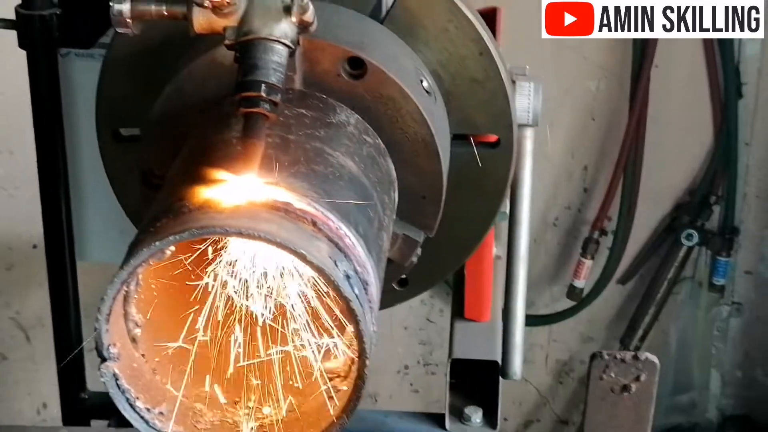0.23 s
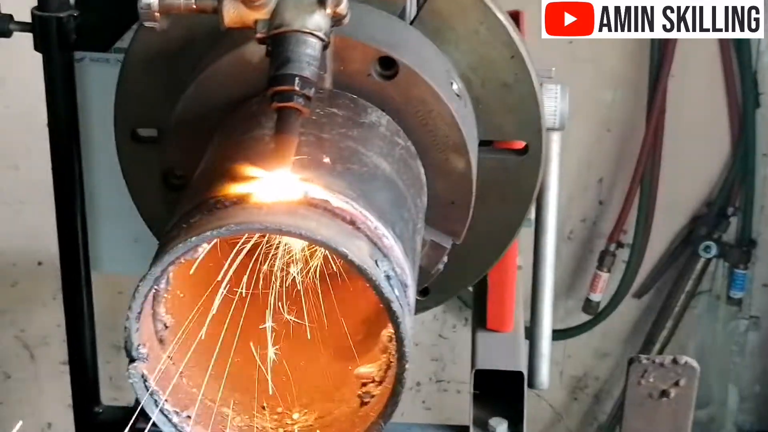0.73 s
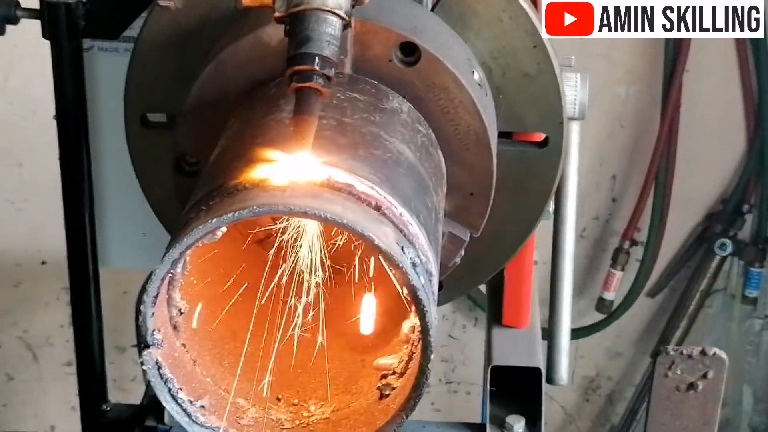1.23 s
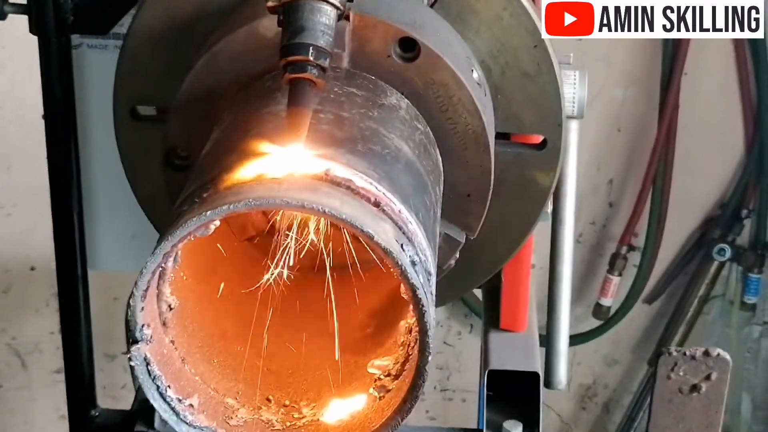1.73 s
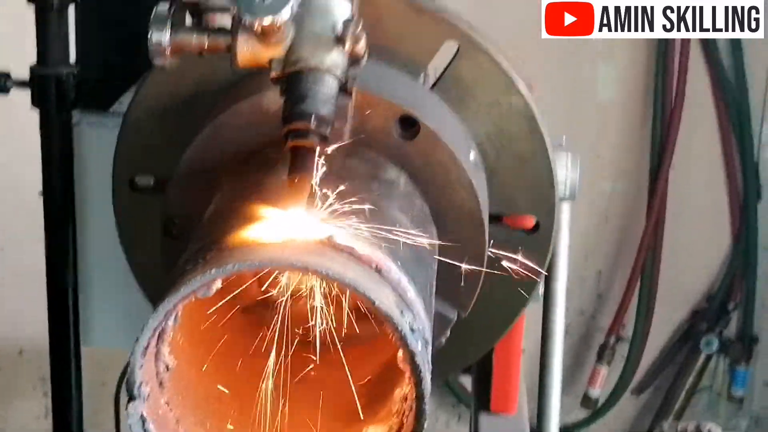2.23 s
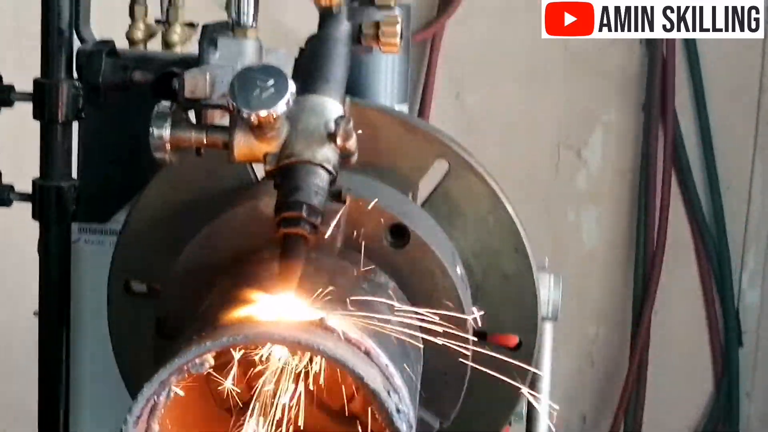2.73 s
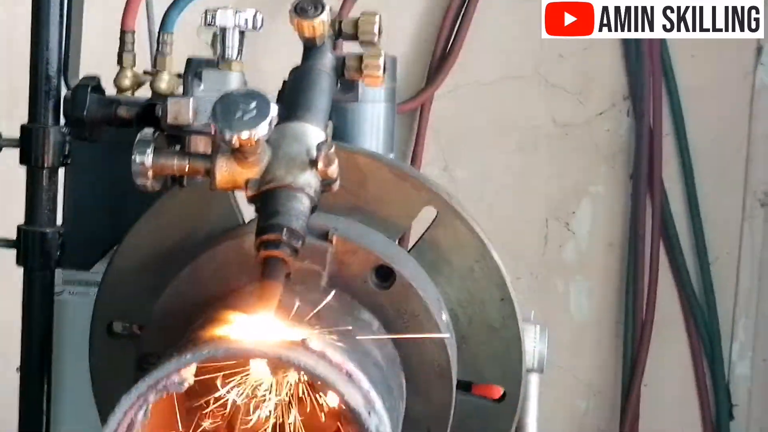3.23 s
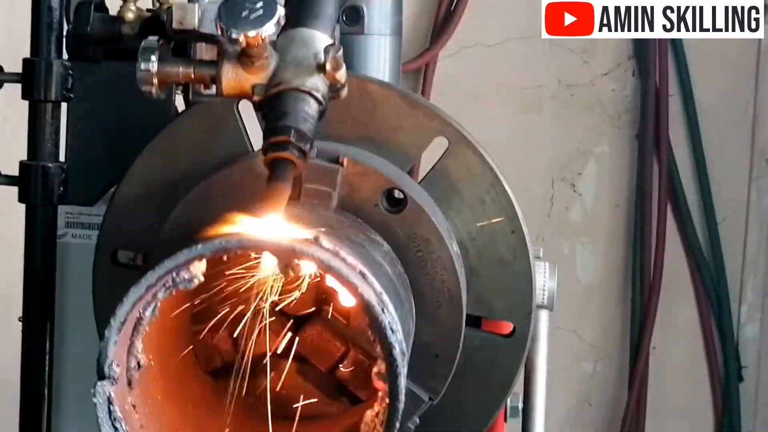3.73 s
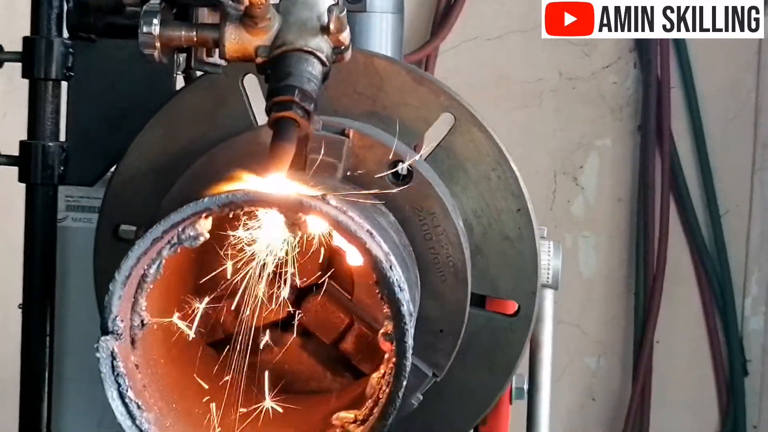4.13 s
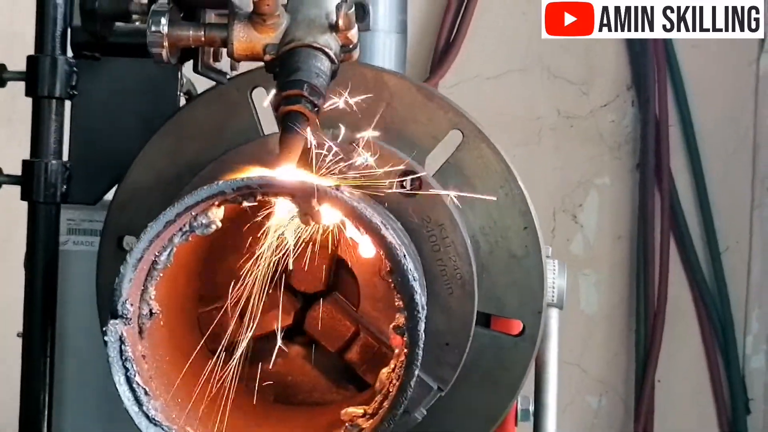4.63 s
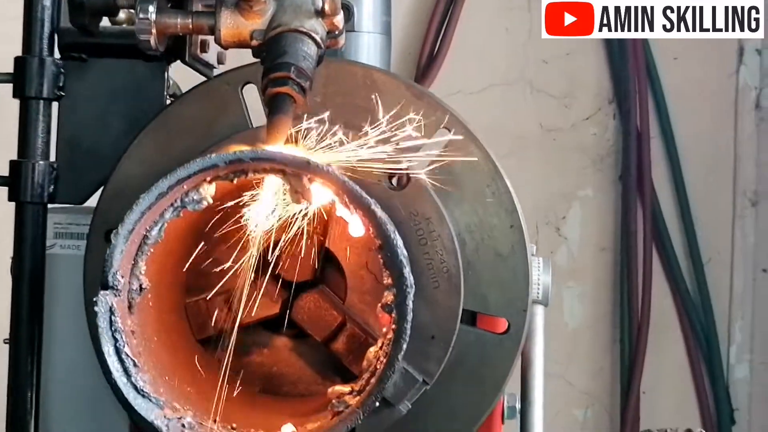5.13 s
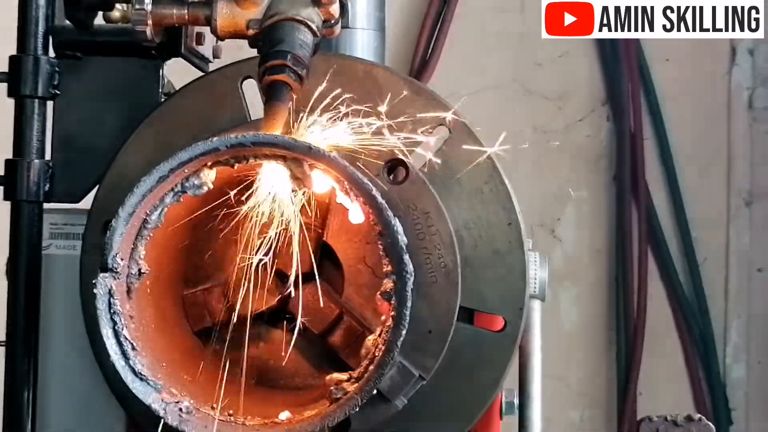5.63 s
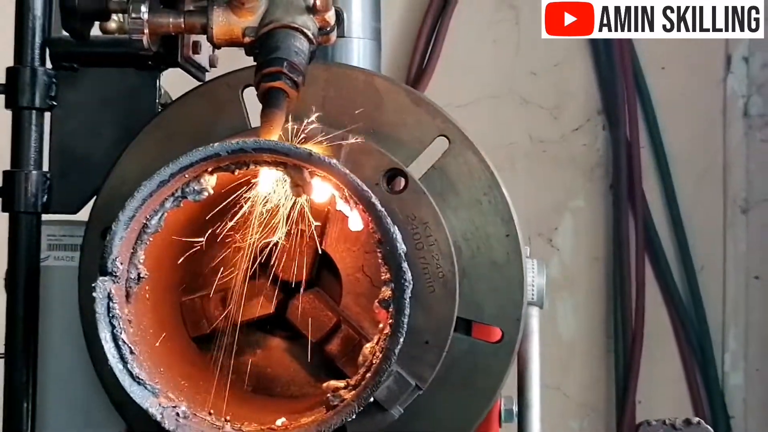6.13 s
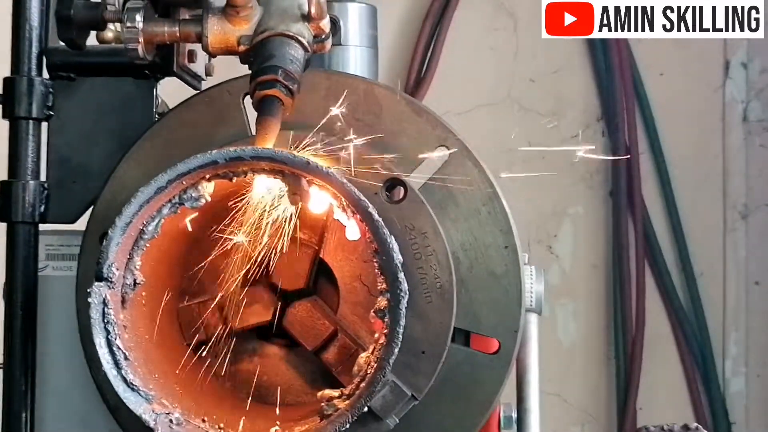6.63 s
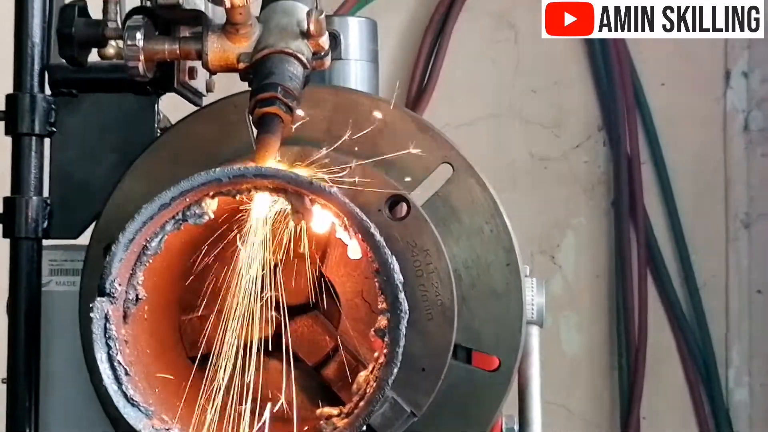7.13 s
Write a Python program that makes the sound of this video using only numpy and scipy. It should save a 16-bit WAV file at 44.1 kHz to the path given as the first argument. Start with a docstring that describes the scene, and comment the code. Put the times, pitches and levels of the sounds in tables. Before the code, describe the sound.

A cutting torch burns through a steel pipe in a workshop, heard close at the open end in stereo. A dense, bright, fluttering hiss runs throughout with fine sizzling sparks. It thins after about a second, wavers, then regains full strength by three and a half seconds and stays strong. Faint hollow rumble and drone from the pipe sit underneath.

```python
"""Torch cutting a steel pipe

An oxy-acetylene torch cuts round a pipe in a workshop, heard close to the open pipe end by a moving stereo pair.
Nozzle hiss, kerf shrill, slag spray and flame roar are filtered noise with fluttering levels; random puffs crackle.
The bore adds rumble and drone in gusts, noise-fed resonances and wavering sine notes.
Edge tones and broader bands of the jet are noise swells; a faint sine hums beneath."""
import sys
import numpy as np
from scipy import signal
from scipy.fft import rfft, irfft, next_fast_len
from scipy.io import wavfile
from scipy.ndimage import map_coordinates

SR = 44100
rng = np.random.default_rng(int(sys.argv[2]) if len(sys.argv) > 2 else 0)


def pcm_store(signal):
    """Save signal as 16-bit PCM."""
    levels = np.round(np.clip(np.atleast_2d(signal), -1, 1) * 32767)
    wavfile.write(sys.argv[1], SR, levels.astype(np.int16).T)


N = 325458
TIME_S = np.arange(N) / SR
FFT_SIZE = next_fast_len(N)
FREQS_HZ = np.maximum(np.arange(FFT_SIZE // 2 + 1) * SR / FFT_SIZE, 1)

# Noise spectra of the streams. Each row: frequency in Hz, relative density in dB.
ROAR_SPECTRUM = [(450, -30), (750, -12.5), (1000, -2.5), (1220, -5), (1360, -2.5), (1480, 0), (1650, 0),
                 (2100, 1), (3000, -57), (5000, -45)]
RUSH_SPECTRUM = [(1400, -23), (1850, -5.5), (2150, -0.5), (2450, 4), (2750, 0.8), (3050, 2.5), (3350, 2.5),
                 (3620, -7.5), (4100, -7), (5000, -19.5)]
FIZZ_SPECTRUM = [(10000, -28.5), (10900, -1), (11400, 2.5), (12000, 0), (12600, -1), (13200, -1),
                 (14000, -7), (14700, -9), (15500, -27)]
KERF_SPECTRUM = [(3700, -41.5), (4250, -9.5), (4750, -2.5), (5050, -1), (5400, 1.5), (5750, -1.5),
                 (6020, 1), (6400, -6), (7200, -7), (9000, -41)]
NOZZLE_SPECTRUM = [(2800, -29), (3800, -5.5), (4500, -5.5), (6200, -4), (6650, 6), (6850, 3.5), (7150, 6.5),
                   (7600, 2.5), (8300, -5), (10000, -13), (13700, -13), (14550, -2.5), (15000, -1.5),
                   (15500, -12)]
SPRAY_SPECTRUM = [(6000, -26.5), (7800, 0), (8500, 1), (9100, -0.5), (9700, 3.5), (10250, 2.5),
                  (10700, -1.5), (11500, -23), (14000, -40)]
RUMBLE_SPECTRUM = [(15, -5), (43, 3), (72, 0), (100, -0.7), (185, 0.3), (240, -4.5), (330, -7.5),
                   (450, -16), (900, -54)]
DRONE_SPECTRUM = [(250, -29), (400, -8.5), (510, 4), (590, 1.5), (665, -5.5), (760, 0.5), (950, -8.5),
                  (1500, -47)]

# Microphone level difference. Each row: frequency in Hz, left over right in dB.
MIC_BALANCE = [(28, 4), (70, 1.5), (700, 4), (1100, -0.5), (1600, -7), (2100, -11), (2500, -8.5),
               (3100, -3.5), (4100, -1), (5000, -2.5), (6500, -0.5), (7500, 5), (8900, -3.5), (9800, 4),
               (11300, -10), (15000, 0)]
# Shared part of the noise at the two microphones. Each row: frequency in Hz, share of power 0-1.
MIC_LIKENESS = [(30, 0.36), (500, 0.82), (1100, 0.83), (1700, 0.52), (2700, 0.28), (3600, 1), (4300, 0.67),
                (5200, 0.81), (6300, 0.36), (8300, 0.64), (8900, 0.1), (9700, 0.39), (11500, 0.4),
                (15000, .22)]
# Microphone phase difference. Each row: frequency in Hz, lead of the left in radians.
MIC_LEAD = [(100, 0), (1750, .25), (2300, 1.5), (3000, 3.0), (4050, 3.2), (4700, 4.6), (5700, 6.2),
            (6400, 8.3), (7000, 10.1), (8700, 11.3), (9100, 14), (10700, 15.2), (12500, 21), (15500, 31)]

# Burning in the cut, slack while the jet barely gets through. Each row: time in seconds, dB about the steady cut.
VIGOUR = [(0.0, -4), (.17, -2.5), (.29, -0.6), (0.98, 0.3), (1.19, -1), (1.3, -3), (1.48, -7), (1.82, -6.5),
          (1.92, -3.5), (2.24, -5), (2.36, -3), (2.65, -5.5), (3.04, -1.8), (3.7, 0), (3.78, -1.1),
          (5.42, 0), (5.56, -0.4), (5.86, 0.75), (6.68, 0.5), (7.36, 1.6)]
# The cut spits or catches on slag. Each row: peak in seconds, length in seconds, change of vigour in dB.
SPITS = [(0.42, 0.055, 2.5), (1.198, 0.03, 0), (2.08, .04, -0.5), (3.9, 0.094, -2), (4.176, 0.033, -3),
         (5.365, 0.051, 1), (5.525, 0.09, 0), (6.325, 0.064, -0.5), (6.598, .05, 0.5), (7.0, .06, 0)]
# The jet beams past the moving microphones. Each row: time in seconds, left over right in dB.
BEAM = [(0.0, -2), (0.32, -4), (1.04, -6), (1.4, 4), (2.32, 4.5), (3.36, 1), (5.0, -1.5), (7.38, -2)]
# Flame rush at the microphones. Each row: time in seconds, level in dB, left over right in dB.
RUSH_VIEW = [(0, -41.5, -4.5), (0.7, -39, -3), (1.201, -38.5, -5.5), (1.5, -46, -6), (1.95, -41, 0.5),
             (2.65, -41.5, -2), (3.0, -39, -0.5), (3.5, -39, -2.5), (4.2, -38, -3), (4.9, -40.5, -1.5),
             (5.7, -39.6, -4.5), (6.35, -38.5, -3), (6.8, -39, -4), (7.38, -38.5, -5)]
# Top fizz of the slag. Each row: time in seconds, level in dB, left over right in dB.
FIZZ_VIEW = [(0, -39, -3.5), (.6, -38.5, -1), (1.1, -36.5, -2), (1.45, -43.5, 0), (2.0, -41.5, 7),
             (2.6, -43.5, 5), (3.1, -39, -3), (3.6, -39, -4), (4.4, -38, -4.5), (5.3, -37.5, -4),
             (6.2, -38.5, -2), (7.38, -39, -3)]
# Nozzle hiss as the microphones rise and return. Each row: time in seconds, steady-cut level in dB, left over right in dB.
NOZZLE_VIEW = [(0.0, -30, -8), (.4, -36, 17), (1.4, -32.5, -4.5), (2.1, -29.5, -2.5), (3.4, -33, -2),
               (5.2, -32, 0), (6.2, -35, 2), (7.38, -34, 3)]
# Resonance of the slot before wander. Each row: time in seconds, frequency in Hz.
SLOT_PITCH = [(0, 5418), (.5, 5353), (.9, 5587), (1.2, 5884), (2.2, 5514), (3.6, 5495), (4.4, 5580),
              (4.95, 5858), (5.4, 5550), (5.8, 5200), (6.4, 5292), (7.38, 5460)]
# Kerf phase as the microphones move. Each row: time in seconds, further lead of the left in radians.
KERF_LEAD = [(0, 0.52), (.75, 0.49), (1.25, -.6), (1.75, -0.051), (2.75, -.4), (3.25, -0.73), (3.75, -0.23),
             (4.75, 0.31), (5.75, 0.25), (7.38, .3)]
# Hiss arriving by way of the walls. Each row: time in seconds, share of power 0-1.
INDIRECT = [(0, 0.5), (1.7, 0.47), (2.3, 0.3), (2.8, 0.07), (4.6, 0.02), (5.25, 0.4), (5.75, 0.07),
            (7.38, .03)]

# Flame gusts and lulls in the bore. Each row: peak in seconds, length in seconds, rumble rise in dB,
# drone rise in dB, rumble swing to the left in dB.
GUSTS = [(.03, 0.19, 1.5, -6, 6), (.42, .09, 0, -1, 1), (.63, 0.15, 2, 1, 4), (.68, 0.71, 7.5, 6.5, 11),
         (1.055, 0.16, 4, 7, 0), (1.905, 0.38, 5, 7, -5), (2.325, 0.25, -1, 7, 4),
         (2.62, .18, -1, -0.5, -4), (3.287, 0.15, -2, 0.5, -2), (3.45, 1.46, 1, 9, 2),
         (5.1, .6, -2.5, -3, -2), (5.92, .14, 4, 0, 7), (6.76, 0.09, 5, 1, 4), (7.36, 0.23, 1, -6, 0)]
# Held note of the bore. Each row: time in seconds, frequency in Hz, level in dB before flutter.
HELD_NOTE = [(0, 593, -75), (.4, 594, -73), (.9, 600, -84), (1.8, 598, -87), (2.15, 606, -67),
             (2.55, 618, -73), (2.8, 624, -62), (3.1, 626, -61.5), (3.5, 630, -63), (3.72, 630, -66),
             (3.95, 629, -77), (4.6, 629, -71), (5.0, 610, -73), (5.6, 600, -71), (5.95, 605, -60),
             (6.2, 603, -73), (6.5, 602, -63), (7.0, 602, -66.5), (7.38, 611, -69.5)]
# Brief sagging notes of the bore. Each row: peak in seconds, length in seconds, frequency at the peak in Hz, level in dB.
PIPINGS = [(3.307, .26, 474, -57), (4.968, 0.19, 932, -62), (5.221, 0.084, 928, -59),
           (5.3, .25, 734, -69.5), (5.412, .11, 910, -61), (6.87, 0.37, 738, -68), (7.171, 0.11, 930, -62)]
# Edge tones and broader bands of the jet. Each row: peak in seconds, length in seconds, frequency in Hz,
# half-width in Hz, level in dB before the common trim, left over right in dB.
WHISTLES = [(.42, .45, 5290, 45, -45, 0), (.46, .3, 7100, 18, -45, 4), (.5, .8, 4780, 150, -44, 0),
            (.55, .65, 5470, 25, -45, 0), (.7, .8, 10250, 300, -48, -8), (.8, 1.4, 3700, 250, -53, -3),
            (1.0, .5, 6030, 50, -46, 3), (1.3, .28, 13900, 600, -46, -10), (1.45, .3, 2500, 300, -54, 6),
            (1.75, .45, 14600, 450, -47, -1), (2.3, .7, 13700, 250, -51, -14),
            (2.85, .3, 13300, 350, -49, -14), (2.85, .55, 14600, 450, -46, -9),
            (3.0, .7, 6300, 450, -43.5, 3), (3.3, .55, 13100, 450, -45.5, -12),
            (3.8, .5, 12300, 350, -48, -10), (3.85, 1.1, 2150, 200, -52, -2),
            (5.145, .11, 6690, 15, -46, 0)]
# Bore resonances blown by the flame. Each row: peak in seconds, length in seconds, frequency in Hz,
# half-width in Hz, level in dB.
HOOTS = [(.5, 1.27, 970, 330, -56.5), (.75, 0.76, 192, 18, -70.5), (.85, 0.67, 1375, 76, -60),
         (1.108, 0.22, 515, 51, -57), (1.9, 0.18, 1380, 50, -64.5), (2.1, 1.3, 1070, 59, -65),
         (2.1, 0.43, 195, 12, -71), (2.286, 0.2, 515, 15, -63), (2.302, 0.24, 390, 56, -69),
         (2.375, .14, 767, 22, -58), (3.295, 0.2, 215, 38, -66), (3.298, .25, 370, 47, -67),
         (3.327, 0.15, 530, 45, -53.5), (3.3, 0.14, 630, 40, -61), (3.7, 0.71, 394, 58, -67.5),
         (3.956, 0.14, 533, 15, -61), (4.651, 0.39, 530, 22, -63.5)]

# Levels at the steady cut; FOLLOWS is the share of the vigour's swing.
ROAR_DB, ROAR_FOLLOWS = -49.5, 1.13
KERF_DB, KERF_FOLLOWS = -32.5, 0.86
SPRAY_DB, SPRAY_FOLLOWS = -36, 0.69
SLOT_DB, SLOT_FOLLOWS = -42, 2.1
NOZZLE_FOLLOWS = 0.59
SLOT_HALF_WIDTH_HZ, SLOT_WANDER_HZ = 220, 69.57
# Left over right with the beam centred, and share of the beam's swing.
ROAR_LEAN_DB, ROAR_BEAM = 4, 0.66
SPRAY_LEAN_DB, SPRAY_BEAM = -1.3, 0.13
RUMBLE_DB, DRONE_DB = -67, -64.5  # between gusts
SAG_HZ_PER_S = 14
HUM_HZ, HUM_DB = 96, -80.5
ECHO_DB = -19  # each path, before the sum is rescaled
TAIL_T60_S = 0.28  # before its spectrum is flattened
TAIL_SWAY_S = 0.0006
CUTOFF_HZ = 15750


def from_db(db):
    """Decibels to gain."""
    return 10 ** (np.asarray(db) / 20)


def in_time(rows):
    """Columns of a time table at every sample."""
    s, *columns = np.transpose(rows)
    return [np.interp(TIME_S, s, column) for column in columns]


def at_hz(rows, hz=FREQS_HZ):
    """A frequency table read on a log axis."""
    knots_hz, values = np.transpose(rows)
    return np.interp(np.log(hz), np.log(knots_hz), values)


def pan(lean_db):
    """Left and right gains of constant total power."""
    sides = from_db(lean_db * np.array([[0.5], [-0.5]]))
    return np.sqrt(2) * sides / np.hypot(*sides)


def bell(peak_s, length_s):
    """Bell of height 1, above half height for the given length."""
    return 0.5 ** ((2 * (TIME_S - peak_s) / length_s) ** 2)


def rise_and_fall(peak_s, length_s, db):
    """Bell-shaped gain that peaks at the given level."""
    return from_db(db) * bell(peak_s, length_s)


def drift(rate_hz):
    """Slow random signal of spread 1: noise through two equal one-pole low-passes."""
    step, settle = 40, 2000
    pole = np.exp(-2 * np.pi * rate_hz * step / SR)
    noise = rng.standard_normal(N // step + settle + 2)
    slow = signal.lfilter([1], [1, -2 * pole, pole * pole], noise)[settle:]
    return np.interp(np.arange(N) / step, np.arange(len(slow)), slow / slow.std())


def turbulence():
    """Stereo spectrum of white noise: a shared direct part and a diffuse part for each microphone."""
    direct, *diffuse = rfft(rng.standard_normal((3, FFT_SIZE)))
    alike = np.clip(at_hz(MIC_LIKENESS), 0, 1)
    pair = np.sqrt(alike) * direct + np.sqrt(1 - alike) * np.array(diffuse)
    pair[1] *= np.exp(-1j * at_hz(MIC_LEAD))
    return pair * pan(at_hz(MIC_BALANCE))


def coloured(noise, response):
    """Stereo noise through a frequency response; rms 1 over both channels."""
    x = irfft(noise * response, FFT_SIZE)[:, :N]
    return x / x.std()


def resonance(hz, half_width_hz):
    """Response that falls to half amplitude at the half-width."""
    return 1 / (1 + ((FREQS_HZ - hz) / half_width_hz) ** 2)


def gas(spectrum, level_db, flutter_db, flutter_hz):
    """Turbulent stream whose strength flutters about its level."""
    gain = from_db(level_db + flutter_db * drift(flutter_hz))
    return gain * coloured(turbulence(), from_db(at_hz(spectrum)))


def aimed(spectrum, view, flutter_db, flutter_hz):
    """Fluttering stream whose level and side change as the microphones move."""
    level_db, lean_db = in_time(view)
    x = coloured(turbulence(), from_db(at_hz(spectrum)))
    x = x / x.std(axis=1, keepdims=True)
    return from_db(level_db + flutter_db * drift(flutter_hz)) * pan(lean_db) * x


def shrill(vigour_db):
    """The jet excites the slot it has cut; the resonance slides as the slot changes shape."""
    hz = in_time(SLOT_PITCH)[0] + SLOT_WANDER_HZ * drift(3)
    centre_hz = hz.mean()
    band = coloured(turbulence(), resonance(centre_hz, SLOT_HALF_WIDTH_HZ))
    slide = np.exp(2j * np.pi * np.cumsum(hz - centre_hz) / SR)
    slid = (signal.hilbert(band, FFT_SIZE)[:, :N] * slide).real
    return from_db(SLOT_DB + SLOT_FOLLOWS * vigour_db) * slid


def shifted(x):
    """Turn the right channel's phase as the path from the kerf changes."""
    lead_rad, = in_time(KERF_LEAD)
    right = signal.hilbert(x[1], FFT_SIZE)[:N] * np.exp(-1j * lead_rad)
    return np.array([x[0], right.real])


def sparks(level_db, per_s, spread_db, decay_s):
    """Drops of burning steel burst at random, each a tiny bright puff of decaying noise."""
    sizes = from_db(spread_db * np.minimum(rng.exponential(1, N), 4))
    bursts = (rng.random(N) < per_s / SR) * sizes
    envelope = signal.lfilter([1], [1, -np.exp(-1 / (decay_s * SR))], bursts + 1e-18)
    response = sum(from_db(at_hz(spectrum)) for spectrum in (SPRAY_SPECTRUM, FIZZ_SPECTRUM, KERF_SPECTRUM))
    crackle = envelope * coloured(turbulence(), response)
    return from_db(level_db) * crackle / crackle.std()


def reflections(x, longest_s, sway_s, count=10):
    """Pipe wall, chuck and bench echo the torch; the paths sway, so a fine comb shifts through the sound."""
    out = x.copy()
    for channel in range(2):
        for delay_s in rng.uniform(longest_s / 10, longest_s, count):
            arrival_s = TIME_S - delay_s - sway_s * drift(0.23)
            out[channel] += from_db(ECHO_DB) * np.interp(arrival_s, TIME_S, x[channel], left=0)
    return out / np.sqrt(1 + count * from_db(ECHO_DB) ** 2)


def workshop(x):
    """A short diffuse tail, unrelated and swaying in the two channels, replaces part of the direct sound."""
    share = np.clip(in_time(INDIRECT)[0], 0, 1)
    tail = rfft(rng.standard_normal((2, N)) * from_db(-60 * TIME_S / TAIL_T60_S), FFT_SIZE)
    # Only the tail's phase is used, so the tone is unchanged.
    wet = irfft(rfft(x, FFT_SIZE) * tail / np.abs(tail), FFT_SIZE)[:, :N]
    swayed = np.array([map_coordinates(side, [(TIME_S - TAIL_SWAY_S * drift(0.5)) * SR], order=3)
                       for side in wet])
    return np.sqrt(1 - share) * x + np.sqrt(share) * swayed


def hiss():
    """Roar, kerf, spray and crackle rise with the vigour of the cut, the nozzle less; rush and fizz keep their own levels."""
    vigour_db = in_time(VIGOUR)[0] + sum(db * bell(s, length_s) for s, length_s, db in SPITS)
    beam_db, = in_time(BEAM)
    nozzle_db, nozzle_lean_db = in_time(NOZZLE_VIEW)
    spray_db = SPRAY_DB + SPRAY_FOLLOWS * vigour_db
    roar = gas(ROAR_SPECTRUM, ROAR_DB + ROAR_FOLLOWS * vigour_db, flutter_db=1.0, flutter_hz=13)
    rush = aimed(RUSH_SPECTRUM, RUSH_VIEW, flutter_db=1.0, flutter_hz=27)
    fizz = aimed(FIZZ_SPECTRUM, FIZZ_VIEW, flutter_db=1.2, flutter_hz=20)
    kerf = gas(KERF_SPECTRUM, KERF_DB + KERF_FOLLOWS * vigour_db, flutter_db=0.9, flutter_hz=12.5)
    kerf = kerf + shrill(vigour_db)
    nozzle = gas(NOZZLE_SPECTRUM, nozzle_db + NOZZLE_FOLLOWS * vigour_db, flutter_db=0.96, flutter_hz=14)
    spray = gas(SPRAY_SPECTRUM, spray_db, flutter_db=1.0, flutter_hz=28)
    crackle = sparks(spray_db - 21.0, per_s=120, spread_db=13.0, decay_s=0.00089)
    beamed = (shifted(kerf) * pan(beam_db) + nozzle * pan(nozzle_lean_db)
              + roar * pan(ROAR_LEAN_DB + ROAR_BEAM * beam_db)
              + spray * pan(SPRAY_LEAN_DB + SPRAY_BEAM * beam_db))
    return workshop(reflections(beamed + rush + fizz + crackle, longest_s=0.014, sway_s=0.00005))


def mains_hum():
    """Faint steady sine of the workshop's mains hum."""
    return from_db(HUM_DB) * np.sqrt(2) * np.sin(2 * np.pi * HUM_HZ * TIME_S)


def tone(hz, gain, waver_hz, flutter_db):
    """Thin note whose pitch wavers and whose strength flutters."""
    phase = 2 * np.pi * np.cumsum(hz + waver_hz * drift(23.4)) / SR
    strength = gain * from_db(flutter_db * drift(5.8))
    return strength * pan(at_hz(MIC_BALANCE, hz.mean())) * np.sqrt(2) * np.sin(phase)


def sing():
    """The bore holds one faint note that creeps up and sinks back; shakier, sagging notes come and go."""
    hz, level_db = in_time(HELD_NOTE)
    notes = tone(hz, from_db(level_db), waver_hz=2.2, flutter_db=2.0)
    for peak_s, length_s, peak_hz, db in PIPINGS:
        sagging_hz = peak_hz - SAG_HZ_PER_S * (TIME_S - peak_s)
        notes = notes + tone(sagging_hz, rise_and_fall(peak_s, length_s, db), waver_hz=3.85, flutter_db=2.0)
    return notes


def swell(noise, peak_s, length_s, hz, half_width_hz, db):
    """Turbulence feeds one resonance, which grows and fades again."""
    return rise_and_fall(peak_s, length_s, db) * coloured(noise, resonance(hz, half_width_hz))


def bore():
    """Air in the pipe rumbles and drones, shifting with gusts and lulls, and hoots and sings."""
    rumble_rise_db, drone_rise_db, swing_db = sum(
        np.outer(changes_db, bell(s, length_s)) for s, length_s, *changes_db in GUSTS)
    rumble = gas(RUMBLE_SPECTRUM, RUMBLE_DB + rumble_rise_db, flutter_db=2.0, flutter_hz=5.1)
    drone = gas(DRONE_SPECTRUM, DRONE_DB + drone_rise_db, flutter_db=2.0, flutter_hz=3.8)
    flow = turbulence()
    hoots = sum(swell(flow, *row) for row in HOOTS)
    air = reflections(rumble * pan(swing_db) + drone, longest_s=0.028, sway_s=0.00018)
    return air + hoots + sing()


def whistles(trim_db):
    """Edge tones and broader bands of the jet, some leaning to one side."""
    flow = turbulence()
    return from_db(trim_db) * sum(swell(flow, *row) * pan(lean_db) for *row, lean_db in WHISTLES)


def scene():
    """The torch on the pipe, over the hum of the workshop."""
    return hiss() + mains_hum() + bore() + whistles(trim_db=3.5)


def record(dry):
    """Steep elliptic low-pass cuts the top."""
    low_pass = signal.ellip(12, 0.1, 90, CUTOFF_HZ, fs=SR, output="sos")
    return signal.sosfilt(low_pass, dry)


dry = scene()
out = record(dry)
pcm_store(out)
```